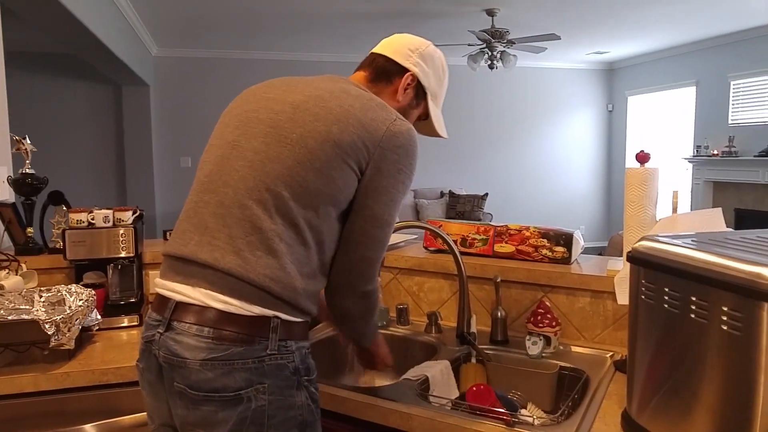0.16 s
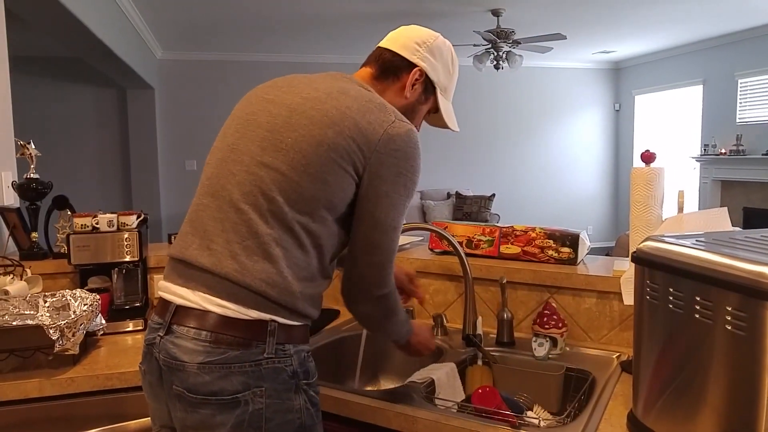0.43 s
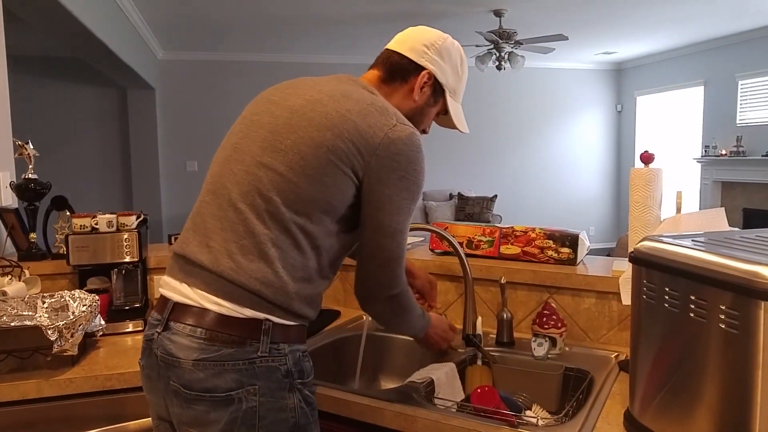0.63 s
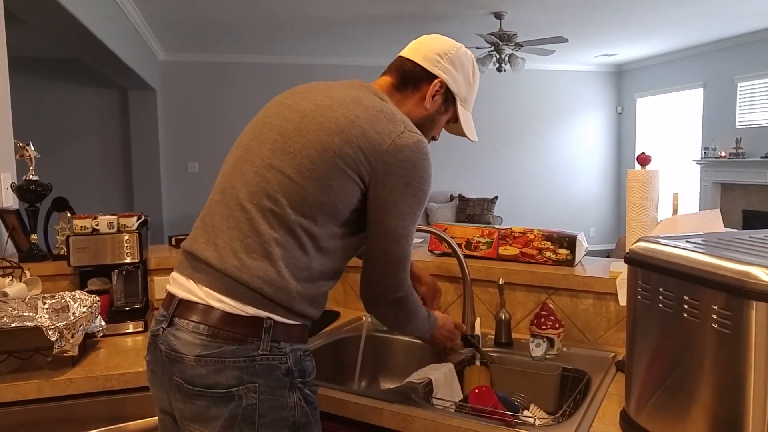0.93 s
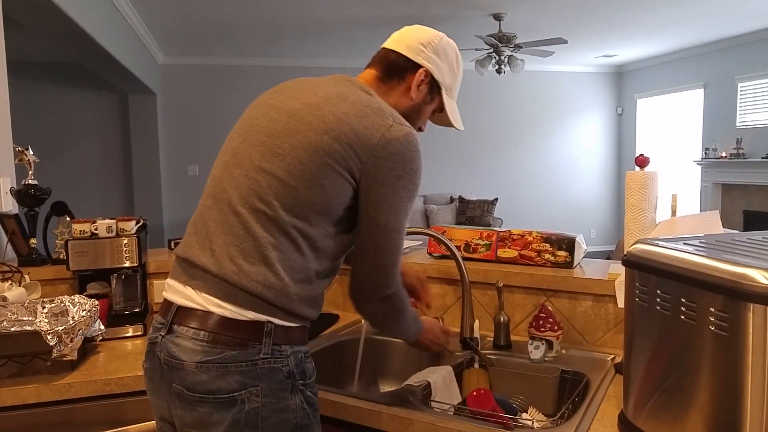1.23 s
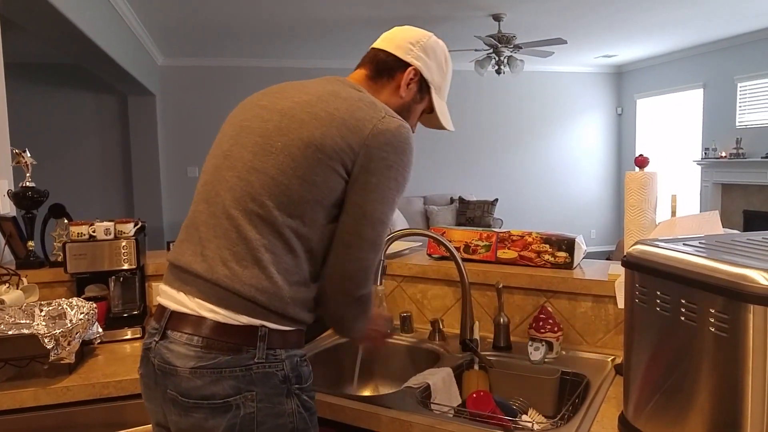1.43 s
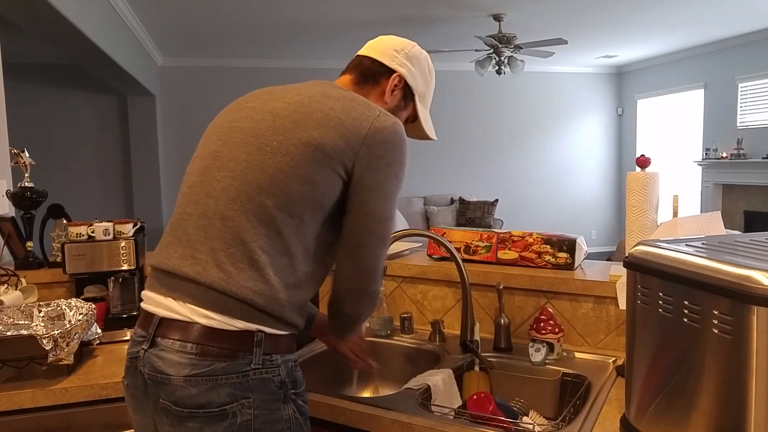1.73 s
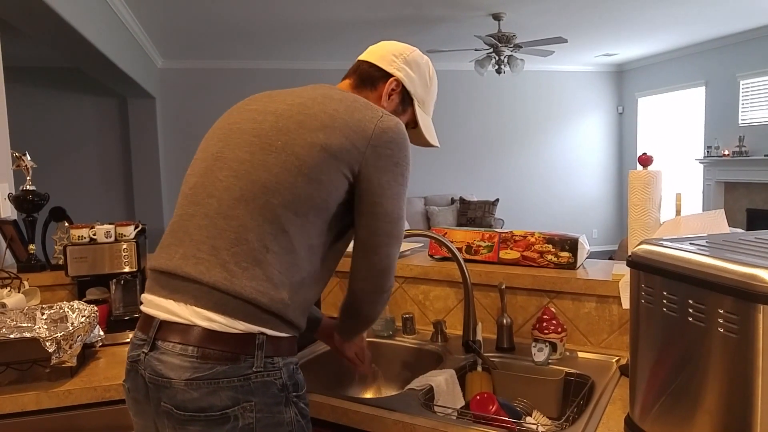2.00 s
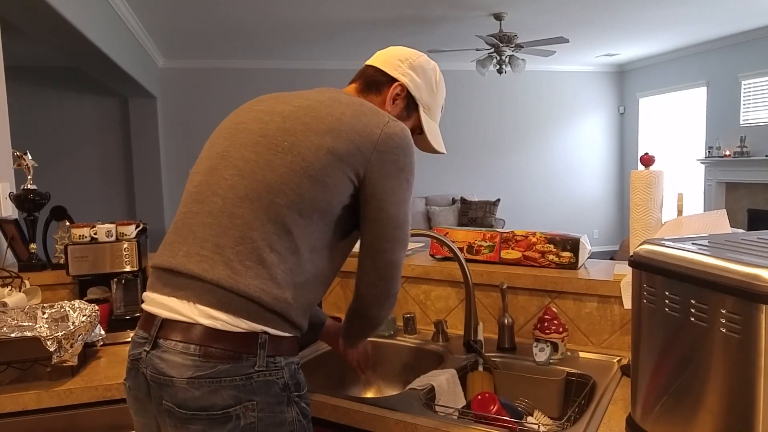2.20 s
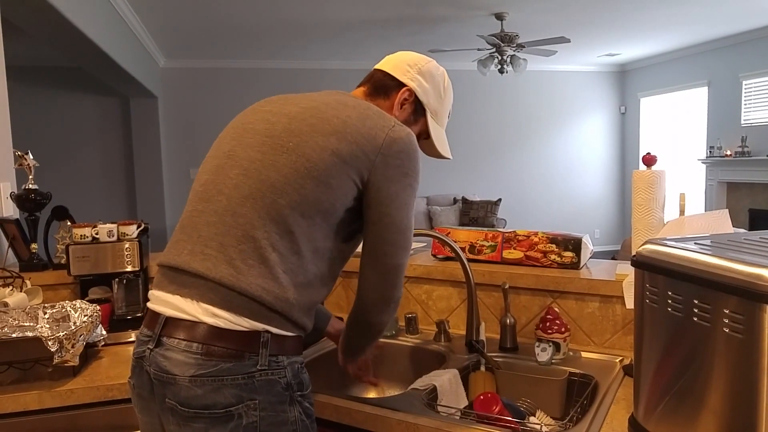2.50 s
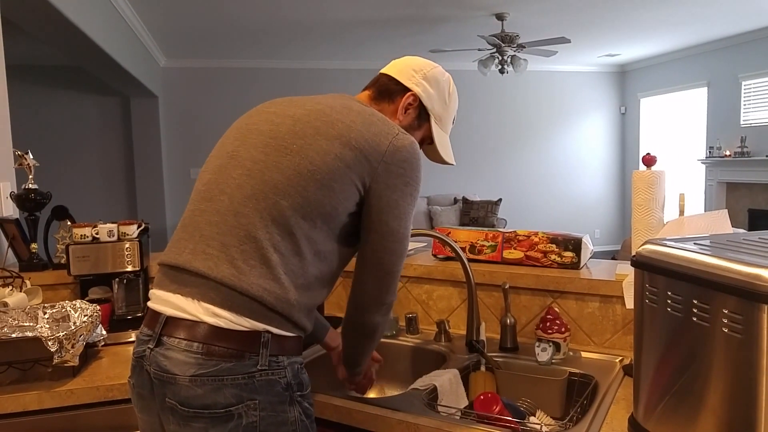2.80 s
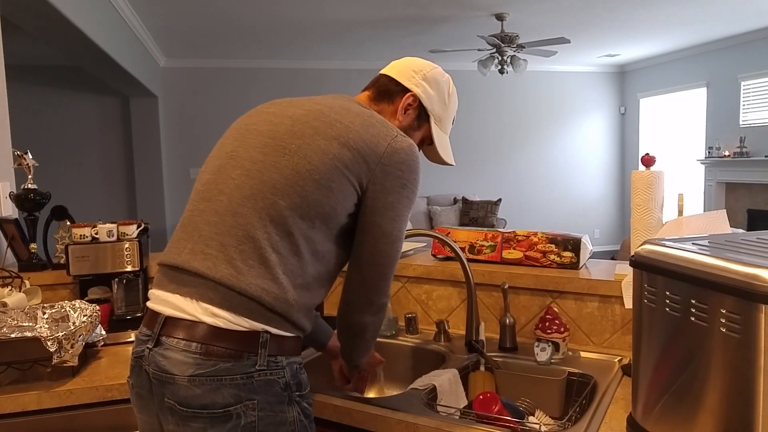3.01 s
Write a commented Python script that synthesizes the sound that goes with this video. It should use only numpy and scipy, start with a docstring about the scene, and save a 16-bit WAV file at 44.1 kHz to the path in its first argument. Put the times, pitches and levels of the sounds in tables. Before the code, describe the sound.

Tap water runs and splashes into a steel sink as hands are washed under it.

```python
"""Fizzing, splashing tap water is heard first: hands are washed over a steel basin, each rub swelling the spray.
Short blips make the spray and drops, and sines rising in pitch make the bubbles.
The tap arm is swung and the basin knocked twice: fading sines ring the steel, with bursts of noise for clatter.
Low noise and a sine make the rumble and an appliance's hum. Two small microphone ports shape it all;
the right one is open to the spray."""
import sys
import numpy as np
from scipy import signal
from scipy.io import wavfile

SR = 44100
rng = np.random.default_rng(int(sys.argv[2]) if len(sys.argv) > 2 else 0)


def dump(signal):
    """Clip the signal to [-1, 1] and save it as 16-bit WAV at the path in sys.argv[1]."""
    limited = np.clip(np.atleast_2d(signal).T, -1, 1)
    pcm = np.round(limited * 32767).astype(np.int16)
    wavfile.write(sys.argv[1], SR, pcm)


N = 138915  # length in samples

# All levels in the tables are relative: the functions trim, filter or balance them further.
# Rumble of the stream and room air, by pitch: pitch_hz, level_db (per Hz)
RUMBLE_SPECTRUM = [(15, -60), (25, -39), (41, -24), (54, -16), (65, -7.5), (80, -17), (100, -16),
                   (135, -9.5), (167, -12.5), (220, -9), (300, -9), (400, -9), (470, -19), (510, -28),
                   (560, -17), (694, -5), (800, -10), (933, -9), (1070, -16.5), (1600, -23.5),
                   (3000, -27.5)]
# Loudness of the rumble over time: time_s, level_db
RUMBLE_LEVEL = [(0.0, -47), (0.46, -48), (0.9, -42.5), (1.18, -42), (1.3, -42), (1.65, -43.5), (2.6, -44),
                (3.15, -44.5)]
# How alike the rumble is at the two ports: pitch_hz, likeness (1 = identical)
LEFT_RIGHT_LIKENESS = [(60, 0.96), (130, 0.92), (290, 0.93), (640, 0.74), (1410, 0.17), (3100, 1),
                       (6820, 0.14), (15000, 0.05)]
# Slow changes in the appliance's hum: time_s, level_db
HUM_SWELL = [(0, -5), (.65, -3), (.85, 1.5), (3.15, -0.4)]
# Ringing notes of the steel basin: pitch_hz, level_db, time_to_fall_60_db_s
BASIN_NOTES = [(189, -7, 0.25), (212.5, -0.5, 0.35), (232, -3.5, 0.26), (291, -14, .2), (348, -15, 0.18),
               (393, -4.5, 0.26), (607, -14, 0.086), (707, -12.5, 0.21), (790, -27, 0.047),
               (920, -22, 0.11), (1060, -18.5, 0.063), (1353, -18, 0.055), (1500, -23.5, .09)]
# Knocks on the basin: start_s, level_db, brightness_db_per_octave, blow_length_s, clatter_db
KNOCKS = [(1.163, -50, 11, 0.0023, -44), (1.176, -41, 9, 0.006, -38), (1.191, -42, 2, 0.01, -39),
          (1.353, -47, 12, 0.003, -46), (1.358, -26.5, -5, 0.014, -60)]
# Clear bubbles: start_s, level_db, pitch_hz, time_to_fall_60_db_s, rise_per_s (as a share of the pitch)
BUBBLES = [(.113, -28, 1500, 0.017, 40), (.132, -27.5, 2770, 0.037, 5), (.144, -17, 2060, 0.015, 103),
           (.195, -25, 2930, .02, 5), (.234, -36, 1330, 0.056, 5.4), (.278, -30, 2970, 0.023, 5),
           (.371, -29, 2390, 0.026, 31), (.46, -25, 3180, 0.016, 33), (1.861, -23, 2700, .01, 40),
           (1.906, -21, 2700, 0.019, 10), (1.936, -26, 1940, 0.022, 15), (2.04, -19, 1230, 0.012, 120),
           (2.067, -20, 1500, 0.013, 120), (2.23, -21.5, 1350, 0.012, 120), (2.432, -8, 3100, 0.0078, 130),
           (2.582, -23, 2800, .006, 120)]
# Strength of the spray as the hands rub: time_s, fizz_db, slosh_db
SPRAY = [(0.0, -28, -42), (0.1, -29, -45), (0.12, -27, -40), (0.14, -24, -38), (0.24, -25, -39),
         (0.27, -31, -41), (0.31, -24, -40), (0.35, -25, -47), (0.38, -25, -40), (0.4, -28, -47),
         (0.43, -30, -44), (0.44, -26, -45), (0.46, -22, -39), (0.48, -26, -45), (0.52, -25, -47),
         (0.54, -24, -40), (0.6, -26, -47), (0.78, -27, -44), (0.83, -23, -43), (0.95, -22, -42),
         (0.98, -26, -44), (1.0, -22, -43), (1.23, -23, -41), (1.34, -24, -43), (1.36, -22, -40),
         (1.39, -25, -43), (1.41, -22, -42), (1.45, -24, -42), (1.6, -23, -43), (1.61, -24, -44),
         (1.67, -22, -41), (1.83, -30, -44), (1.86, -30, -41), (1.88, -27, -45), (1.91, -20, -36),
         (1.99, -24, -40), (2.06, -27, -39), (2.09, -31, -45), (2.115, -29, -43), (2.125, -21, -40),
         (2.14, -27, -40), (2.16, -21, -36), (2.19, -21, -41), (2.23, -27, -39), (2.33, -30, -43),
         (2.385, -27, -41), (2.41, -22, -37), (2.5, -30, -42), (2.575, -30, -45), (2.59, -22, -36),
         (2.6, -26, -39), (2.62, -22, -41), (2.67, -28, -41), (2.76, -28, -39), (2.85, -28, -42),
         (2.88, -28, -43), (3.03, -26, -42), (3.15, -29, -44)]
# Single big drops: start_s, level_db, pitch_hz, splat_db (relative to the drop)
DROPS = [(0.0199, -23, 8400, -12), (0.0608, -19, 8560, -12), (0.111, -6.5, 8700, -6),
         (0.1361, -14, 8300, -19), (0.1524, -12, 8390, -19), (0.2106, -12, 8260, -5),
         (0.2249, -12, 8800, -18), (0.2843, -15, 9280, -15), (0.301, -13.5, 8420, -15),
         (0.3491, -19, 8500, -15), (0.3621, -16, 8550, -16), (0.4354, -10.5, 8240, -16),
         (0.454, -12, 8360, -16), (0.4589, -7, 8550, -20), (0.5237, -14, 8660, -17),
         (0.5354, -6.5, 8870, -22), (0.61, -14, 9050, -16), (0.638, -13, 8400, -15),
         (0.7088, -18, 8570, -11), (0.7367, -15, 8240, -6), (0.7921, -18.5, 8800, -1),
         (0.8245, -17, 8890, -15), (0.8355, -11.5, 9040, -12), (0.92, -9.5, 8840, -19),
         (0.9482, -9.5, 8910, -21), (0.995, -12, 8280, -11), (1.047, -11, 9030, -17),
         (1.1054, -11, 8660, -17), (1.15, -11.5, 8500, -17), (1.1605, -6, 8900, -19),
         (1.3259, -12, 8370, -1), (1.3475, -9, 8900, -18), (1.4082, -2, 9000, -19),
         (1.5364, -13, 9050, -17), (1.5635, -18, 8340, -16), (1.589, -8, 8400, -15),
         (1.5928, -6.5, 8570, -10), (1.6307, -13, 8850, -17), (1.6525, -12, 8850, -19),
         (1.6761, -12, 8490, -19), (1.7474, -14, 8520, -6), (1.8434, -8.5, 8500, -24),
         (1.8806, -14, 8500, -19), (1.8928, -15, 8970, -19), (1.8998, -7, 8100, -12),
         (1.9116, -9, 8230, -12), (2.0188, -14, 8410, -17), (2.0575, -16, 8890, -22),
         (2.0762, -6, 8400, -23), (2.1004, -14, 8790, -16), (2.123, -10, 8800, -19), (2.151, -8, 8470, -15),
         (2.2777, -19, 8590, -15), (2.2987, -18, 8600, -16), (2.3351, -20, 8600, -13),
         (2.355, -17, 8530, -17), (2.378, -19, 8610, -17), (2.393, -11, 8420, -10),
         (2.4039, -10, 8470, -15), (2.5566, -27, 8420, -12), (2.581, -16, 9000, -9),
         (2.585, -14, 8570, -10), (2.6135, -12, 8670, -12), (2.714, -19, 8400, -14),
         (2.7747, -7.5, 8500, -22), (2.8165, -14, 8850, -15), (2.8557, -8.5, 8700, -2),
         (2.9412, -17, 8790, -10), (3.018, -16.5, 8540, -10), (3.1308, -21, 8600, -16)]
# Tone of the slosh: pitch_hz, level_db
SLOSH_TONE = [(700, -63.5), (1100, -15), (1600, -12.5), (2200, -4), (2800, 1), (3500, -1.5), (4500, 2),
              (6000, -2), (9000, -45.5)]
# Treble ringing shared by both microphone ports: pitch_hz, gain_db
PORT_RING = [(4500, 0.78), (5500, 6.2), (6500, 15.3), (6900, 16), (7250, 21.2), (7750, 16), (8300, 28.2),
             (8900, 28.7), (9500, 19.7), (10500, 15.6), (11300, 12.1), (13000, 9.4), (15700, 9.5)]
# Extra change of tone at the left port, mostly duller: pitch_hz, gain_db
LEFT_SHADE = [(4500, 0), (5500, -1), (6500, -2), (7200, 1), (7800, -5), (8300, -12), (8900, -14),
              (9500, -8), (10500, -7), (11300, -9), (11900, -20), (12600, -17), (15600, -19)]

HUM_HZ, HUM_DB, HUM_WAVER_DB = 119.7, -49.5, 1.1
CLATTER_T60_S, DRUMMING_DB = 0.088, -61.5
FAINT_BUBBLES_PER_S, FAINT_BUBBLE_DB, FAINT_BUBBLE_RISE_PER_S = 140, -9, 8
FIZZ_TICKS_PER_S, FIZZ_SPREAD_DB, FIZZ_TURNS = 5000, 5, 4.38
FIZZ_LOW_HZ, FIZZ_HIGH_HZ = 3514, 15340
FIZZ_FROM_HZ, FIZZ_DB = 3300, -16
SLOSH_TICKS_PER_S, SLOSH_SPREAD_DB, SLOSH_TURNS = 1800, 1, 4.7
SLOSH_LOW_HZ, SLOSH_HIGH_HZ, SLOSH_DB = 857, 7144, 1
TICK_TILT_DB_PER_OCTAVE, LARGEST_TICK = -2, 2.86  # the second caps the random size, before the spread
MIST_DB, MIST_FOLLOW = -48.5, 0.7  # follow: share of the spray's dB changes
DROP_DB, DROP_TURNS, DROP_ECHO_DB = -11, 19, -8
SPLAT_HZ, SPLAT_TURNS, SPLAT_DB = 6300, 6, -7.5
DIRECT_DB, TAIL_T60_S = -2.5, 0.086
CEILING, EDGE_HZ = 0.9, 15760  # overload ceiling (1 = full scale), top of the treble


def amp(db):
    """Turn decibels into a plain multiplier."""
    return 10 ** (np.asarray(db) / 20)


def evened(x):
    """Scale a sound to an average (RMS) strength of 1."""
    return x / np.sqrt(np.mean(x ** 2) + 1e-20)


def read(points, hz):
    """Read a table of pitch and value at any pitch, on a logarithmic scale."""
    f, value = np.transpose(points)
    return np.interp(np.log(hz + 1), np.log(f + 1), value)


def curve(table, column):
    """Join a table's points in time into one value per sample."""
    rows = np.array(table)
    return np.interp(np.arange(N) / SR, rows[:, 0], rows[:, column])


def add(mix, s, sound):
    """Lay a short sound into the mix at a time in seconds."""
    part = mix[..., round(s * SR):][..., :sound.shape[-1]]
    part += sound[..., :part.shape[-1]]


def colour(x, points):
    """Change the tone to follow a table of pitch and dB, with no sound ahead of its cause."""
    hz = abs(np.fft.fftfreq(8192, 1 / SR))
    log_gain = np.log(amp(read(points, hz)))
    taps = np.fft.ifft(np.exp(np.conj(signal.hilbert(log_gain)))).real[:2048]
    taps = taps.reshape((1,) * (x.ndim - 1) + (-1,))
    return signal.oaconvolve(x, taps, axes=-1)[..., :N]


def grain(hz, turns):
    """A droplet's blip: a few turns of a sine under a smooth bell, with energy 1."""
    t = np.arange(int(turns / hz * SR) + 2) / SR
    g = np.sin(np.pi * t / t[-1]) ** 2 * np.sin(2 * np.pi * hz * t)
    return g / np.linalg.norm(g)


def ticks(per_s, spread_db, low_hz, high_hz, turns):
    """Random droplets of many sizes, each a short blip at one of 30 pitches; fewer are loud."""
    size = amp(spread_db * np.minimum(rng.exponential(1, N), LARGEST_TICK))
    lands = rng.random(N) < per_s / SR
    hits = size * rng.choice([-1., 1.], N) * lands
    pitches = np.linspace(low_hz, high_hz, num=30)
    kind = np.floor(rng.random(N) * len(pitches))
    out = np.zeros(N)
    for k, hz in enumerate(pitches):
        blip = amp(TICK_TILT_DB_PER_OCTAVE * np.log2(hz / low_hz)) * grain(hz, turns)
        out += signal.oaconvolve(hits * (kind == k), blip)[:N]
    return evened(out)


def scatter(x):
    """Direct sound plus quick reflections off the basin walls; the water lands in changing places."""
    t = np.arange(4096) / SR
    place = rng.integers(0, 6, N // 64 + 1).repeat(64)[:N]  # a new draw every 64 samples
    out = np.zeros((2, N))
    for k in range(6):
        sparse = rng.random((2, 4096)) < .1
        tail = rng.standard_normal((2, 4096)) * sparse * amp(-60 * t / TAIL_T60_S)
        tail /= np.linalg.norm(tail, axis=1, keepdims=True)
        tail[[0, 1], rng.integers(0, 12, 2)] += amp(DIRECT_DB)  # small delay drawn for each side
        out += signal.oaconvolve((x * (place == k))[None], tail, axes=1)[:, :N]
    return out


def rumble():
    """Low noise of the stream and room air, partly shared between the ports, differing with pitch."""
    frames, hz = N // 1024 + 5, np.fft.rfftfreq(4096, 1 / SR)
    a, b, c, d = rng.standard_normal((frames, 2049, 4)).T
    same = np.clip(read(LEFT_RIGHT_LIKENESS, hz), -1, 1)[:, None]
    left = a + 1j * b
    right = same * left + np.sqrt(1 - same ** 2) * (c + 1j * d)
    spectra = np.array([left, right]) * amp(read(RUMBLE_SPECTRUM, hz))[:, None]
    noise = signal.istft(spectra, nperseg=4096, noverlap=3072)[1][:, :N]
    return evened(noise) * amp(curve(RUMBLE_LEVEL, 1) + 0.5)


def hum():
    """An appliance's hum: one low sine whose level swells and wavers slowly."""
    waver = evened(signal.resample(rng.standard_normal(30), N))
    level = amp(HUM_DB + HUM_WAVER_DB * waver + curve(HUM_SWELL, 1))
    return np.sqrt(2) * level * np.sin(2 * np.pi * HUM_HZ * np.arange(N) / SR)


def basin_ring(t, tilt_db, blow_s):
    """The steel rings as a sum of fading sines; the tilt makes a blow brighter or duller."""
    out = np.zeros(len(t))
    for hz, db, t60 in BASIN_NOTES:
        level = amp(db + tilt_db * np.log2(hz / 210) - 60 * t / t60)
        out += level * np.sin(2 * np.pi * hz * (t - blow_s))
    return out


def knocks():
    """Soft blows ring the basin with a short clatter; the stream keeps it faintly humming."""
    out, t = np.zeros(N), np.arange(12000) / SR
    band = signal.butter(2, [600, 3200], "band", fs=SR, output="sos")
    clatter = signal.sosfilt(band, rng.standard_normal((len(KNOCKS), len(t))))
    for (s, level_db, tilt_db, blow_s, clatter_db), noise in zip(KNOCKS, clatter):
        add(out, s, amp(clatter_db - 60 * t / CLATTER_T60_S) * evened(noise))
        blow = np.minimum(t / blow_s, 1)  # fades in over the length of the blow
        add(out, s, amp(level_db) * basin_ring(t, tilt_db, blow_s) * blow)
    drumming = signal.oaconvolve(rng.standard_normal(N), basin_ring(t, 1.8, 0))[:N]
    return out + amp(DRUMMING_DB) * evened(drumming)


def bubbles():
    """Short sines that rise in pitch: the clear ones, and a scatter of faint ones that follow the slosh."""
    out, t = np.zeros(N), np.arange(3000) / SR
    slosh_db = curve(SPRAY, 2)
    every = list(BUBBLES)
    for a, b, c in rng.random((int(FAINT_BUBBLES_PER_S * N / SR), 3)):
        db = slosh_db[int(a * N)] + FAINT_BUBBLE_DB + 8 * b
        every.append((a * N / SR, db, 1200 * 4 ** c, .04, FAINT_BUBBLE_RISE_PER_S))
    for s, db, hz, t60, rise in every:
        level = amp(db - 60 * t / t60) * np.minimum(t / 0.0032, 1)  # 3.2 ms fade-in
        add(out, s, level * np.sin(2 * np.pi * hz * (t + rise * t ** 2 / 2)))
    return out + amp(-5.0) * scatter(out)


def big_drops():
    """Each big drop is a ringing high blip over a shorter, broader splat; both also echo in the basin."""
    drops = np.zeros((2, N))
    for s, db, hz, splat_db in DROPS:
        add(drops, s, amp(db + splat_db + SPLAT_DB) * grain(SPLAT_HZ, SPLAT_TURNS))
        add(drops, s, amp(db + DROP_DB) * grain(hz, DROP_TURNS))
    return drops + amp(DROP_ECHO_DB) * scatter(drops.mean(0))


def slosh():
    """The lower wash of the water: many blips shaped in tone, swelling with the rubs."""
    drops = ticks(SLOSH_TICKS_PER_S, SLOSH_SPREAD_DB, SLOSH_LOW_HZ, SLOSH_HIGH_HZ, SLOSH_TURNS)
    wash = evened(colour(drops, SLOSH_TONE))
    return scatter(wash * amp(curve(SPRAY, 2) + SLOSH_DB))


def spray():
    """Tiny droplets fizz as high blips over a mist of noise; both swell with the rubs."""
    spray_db = curve(SPRAY, 1)
    fizz = ticks(FIZZ_TICKS_PER_S, FIZZ_SPREAD_DB, FIZZ_LOW_HZ, FIZZ_HIGH_HZ, FIZZ_TURNS)
    fizz = scatter(fizz * amp(spray_db + FIZZ_DB))
    mist_db = MIST_DB + MIST_FOLLOW * (spray_db - spray_db.mean())
    mist = amp(mist_db) * rng.standard_normal((2, N))
    high_pass = signal.butter(2, FIZZ_FROM_HZ, "high", fs=SR, output="sos")
    return signal.sosfilt(high_pass, fizz + mist)


def scene():
    """Sum the sounds, from the background to the spray."""
    return rumble() + hum() + knocks() + bubbles() + big_drops() + slosh() + spray()


def record(dry):
    """Each port rings near 8.5 kHz in its own way; loud peaks overload softly; then the top treble is cut."""
    left = colour(colour(dry[0], LEFT_SHADE), PORT_RING)
    right = colour(dry[1], PORT_RING)
    ports = np.array([left, right])
    # Above half the ceiling, peaks bend smoothly towards it.
    knee = CEILING / 2
    bent = np.sign(ports) * knee * (1 + np.tanh(abs(ports) / knee - 1))
    ports = np.where(abs(ports) < knee, ports, bent)
    low_pass = signal.firwin(2047, EDGE_HZ, window=("kaiser", 10), fs=SR)
    return signal.oaconvolve(ports, low_pass[None], "same")


dry = scene()
out = record(dry)
dump(out)
```